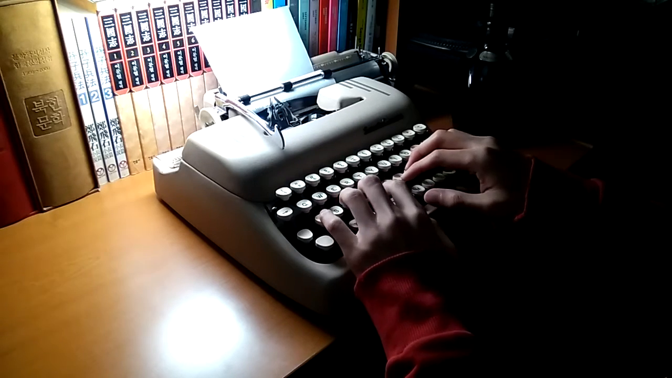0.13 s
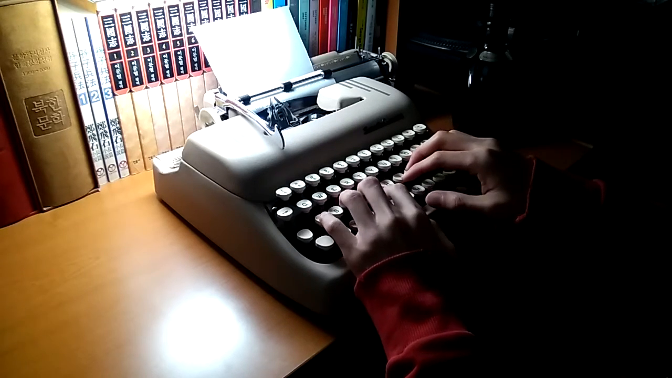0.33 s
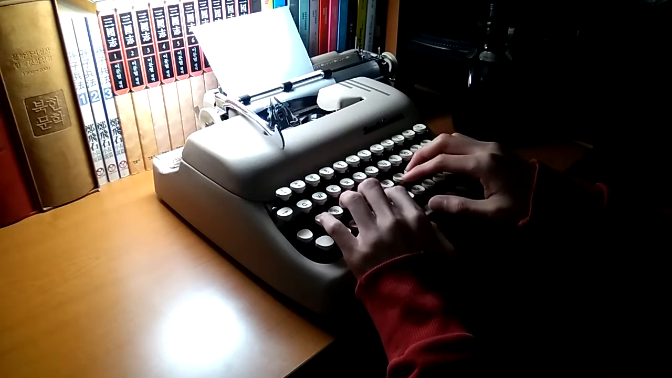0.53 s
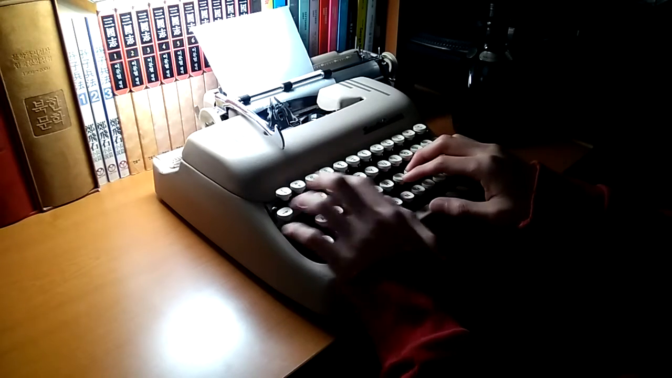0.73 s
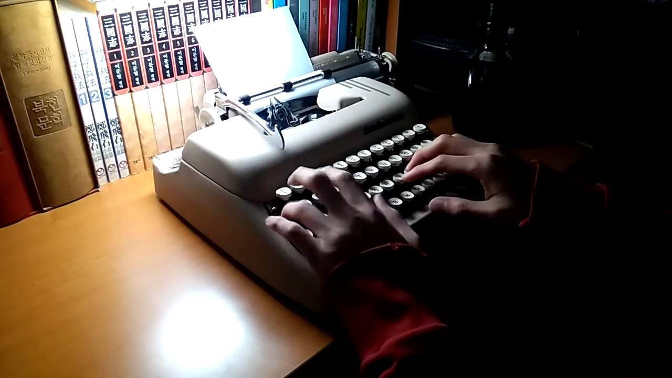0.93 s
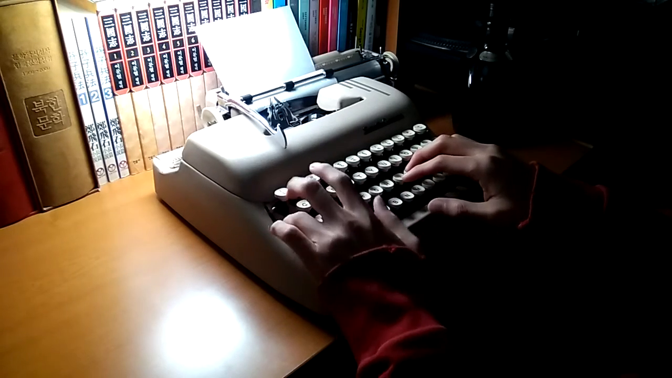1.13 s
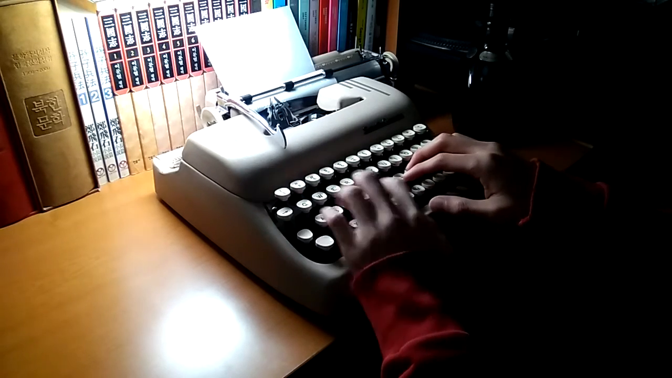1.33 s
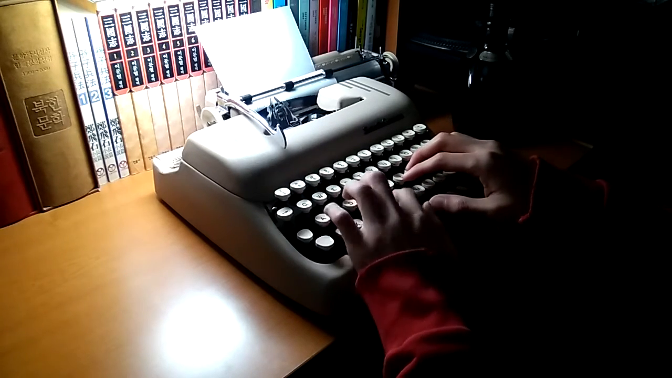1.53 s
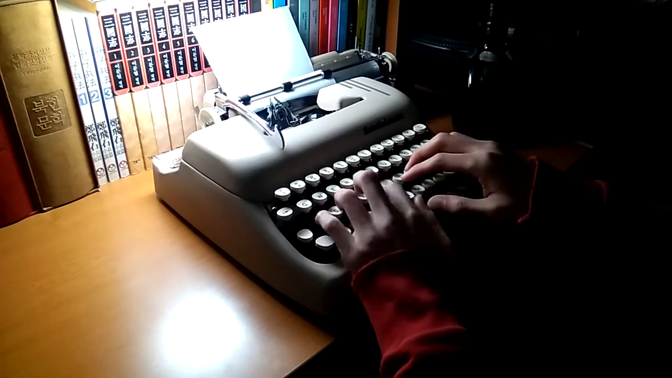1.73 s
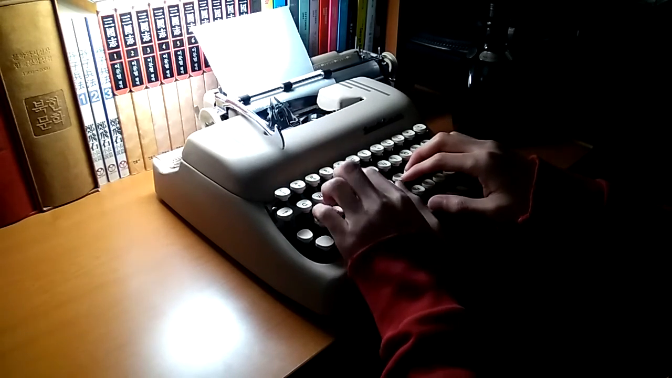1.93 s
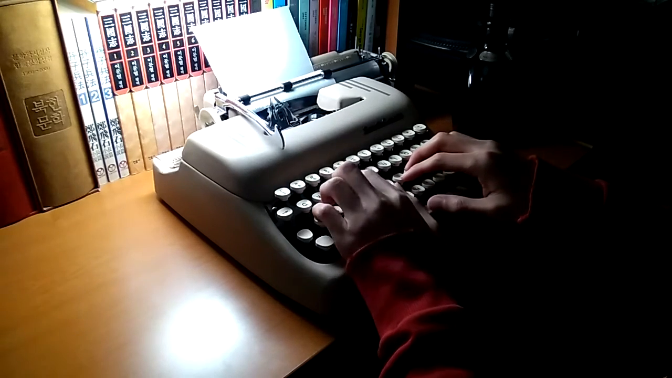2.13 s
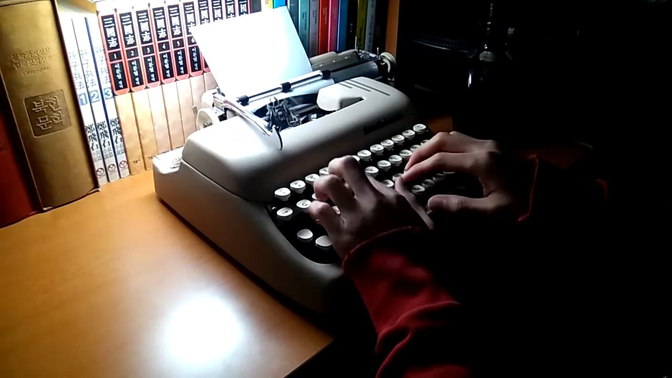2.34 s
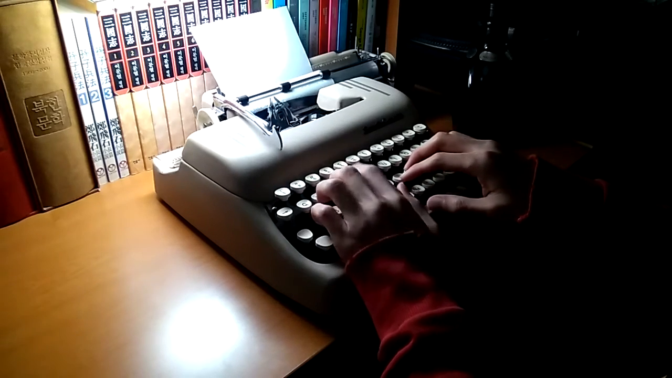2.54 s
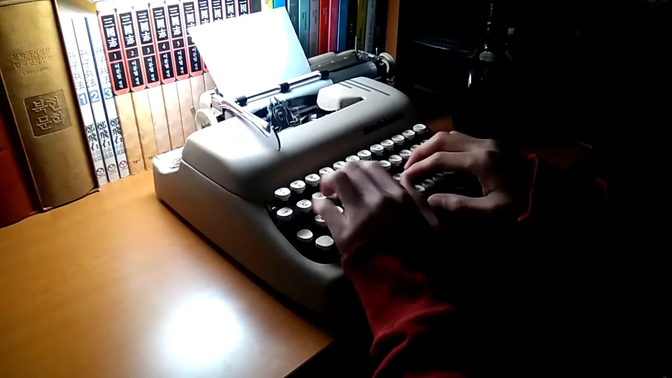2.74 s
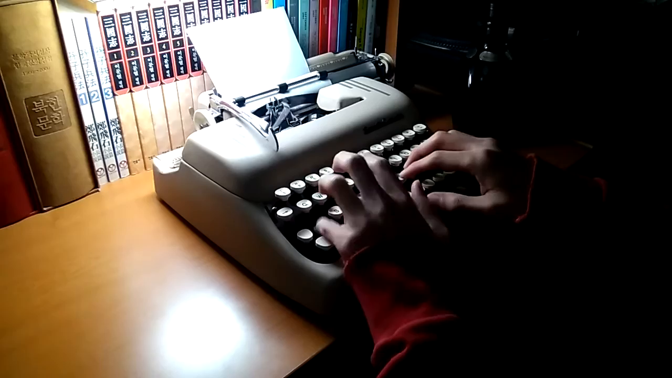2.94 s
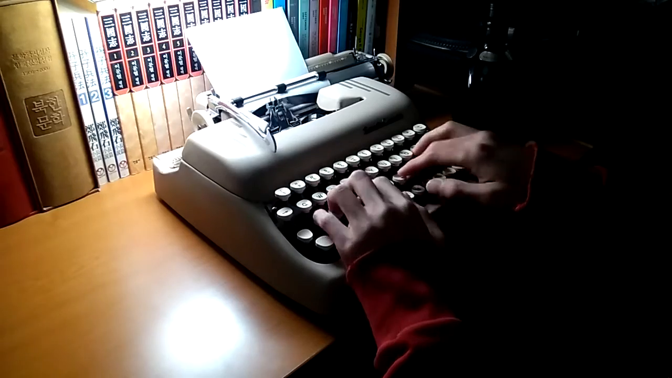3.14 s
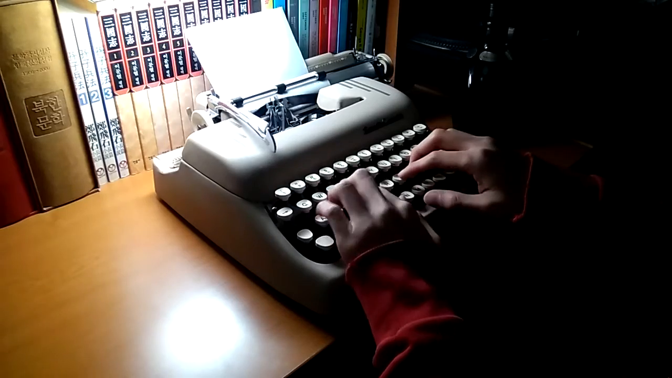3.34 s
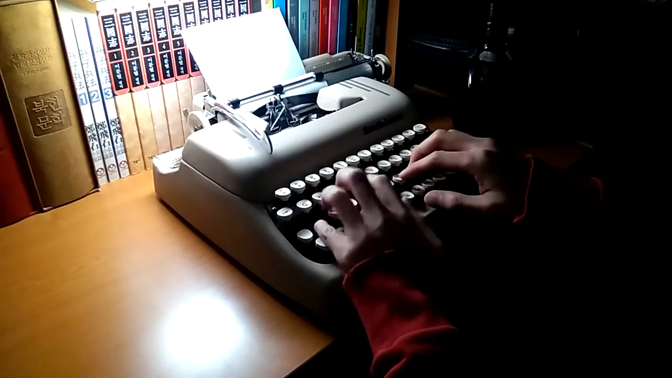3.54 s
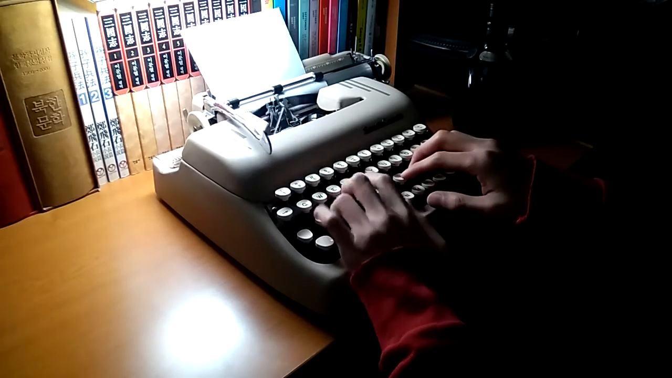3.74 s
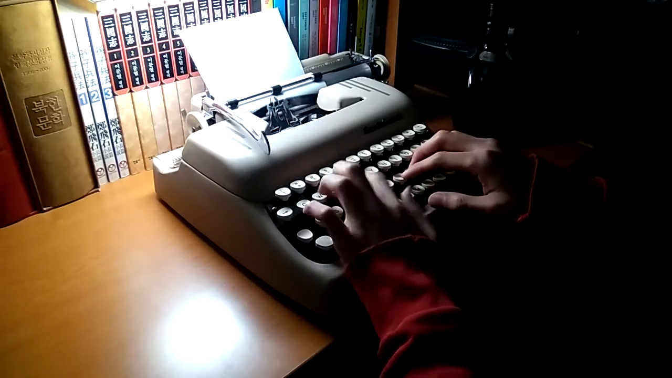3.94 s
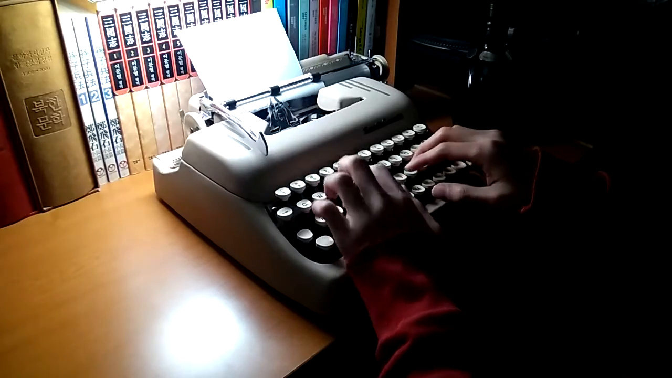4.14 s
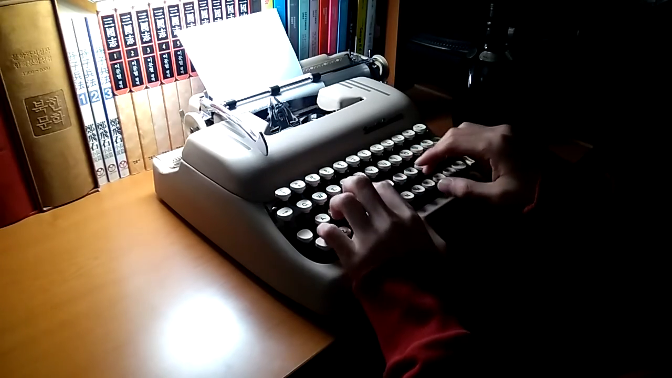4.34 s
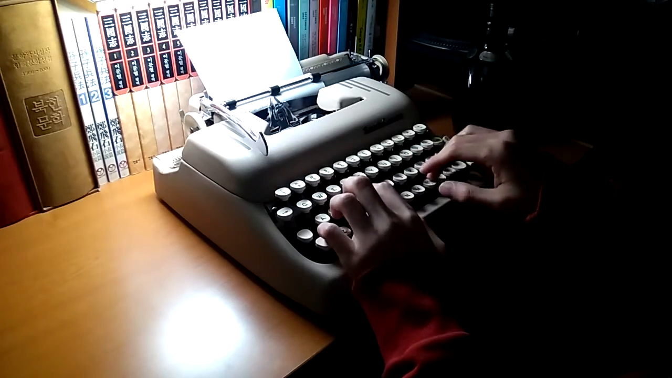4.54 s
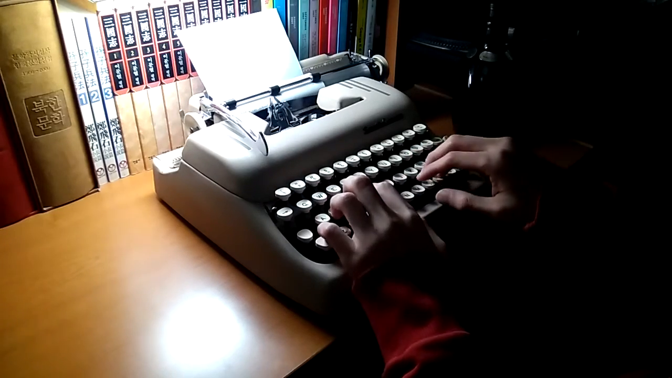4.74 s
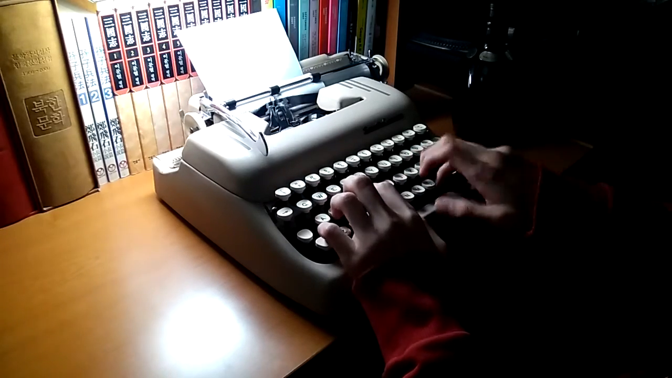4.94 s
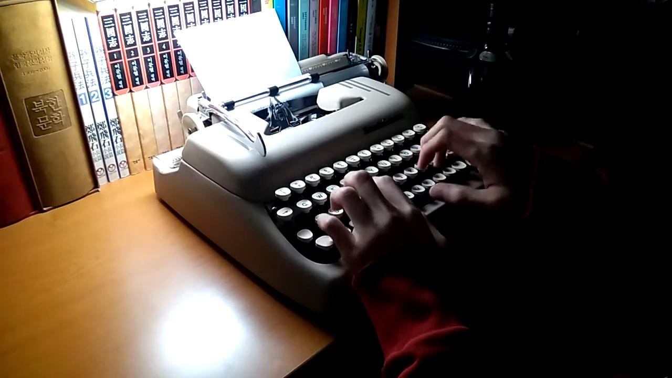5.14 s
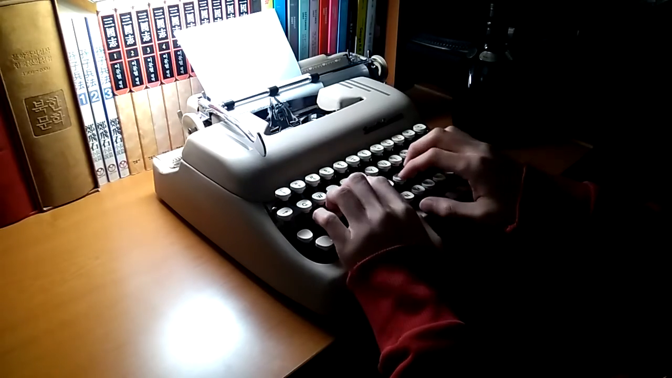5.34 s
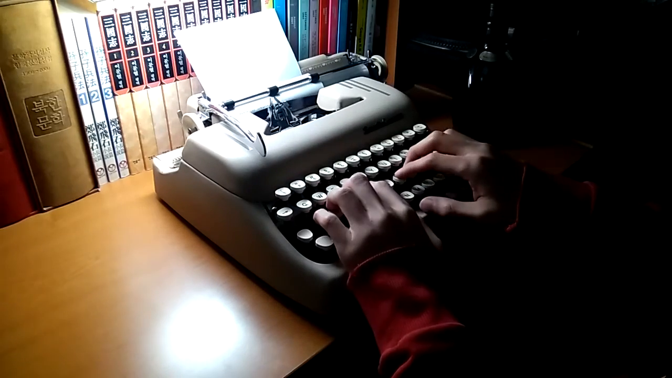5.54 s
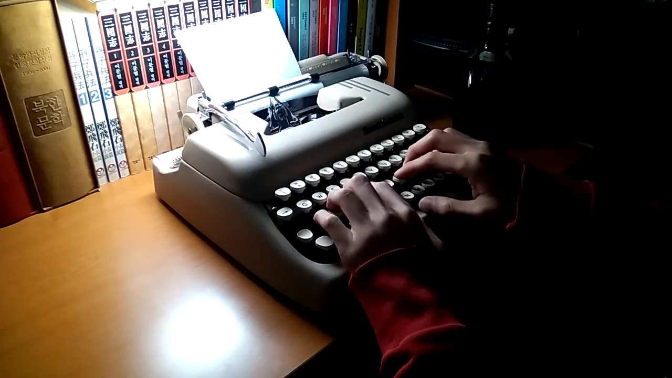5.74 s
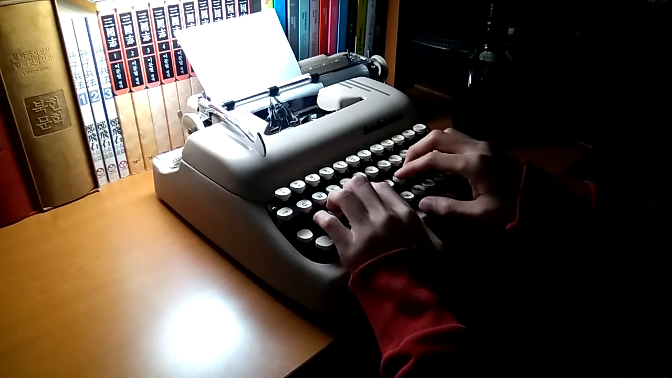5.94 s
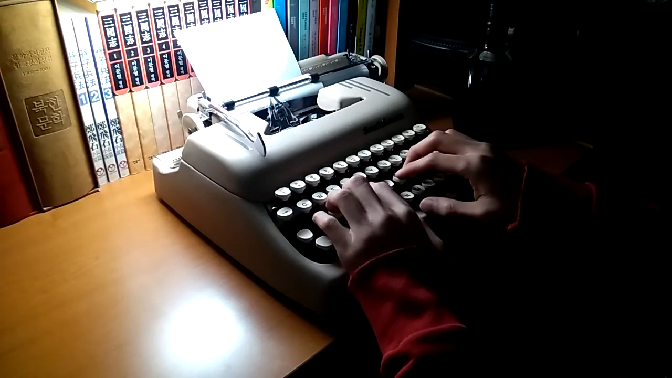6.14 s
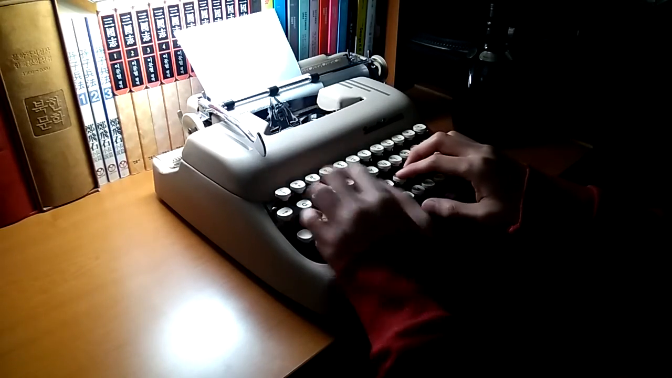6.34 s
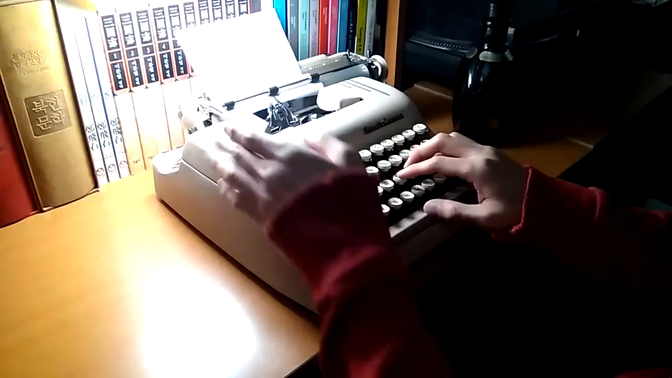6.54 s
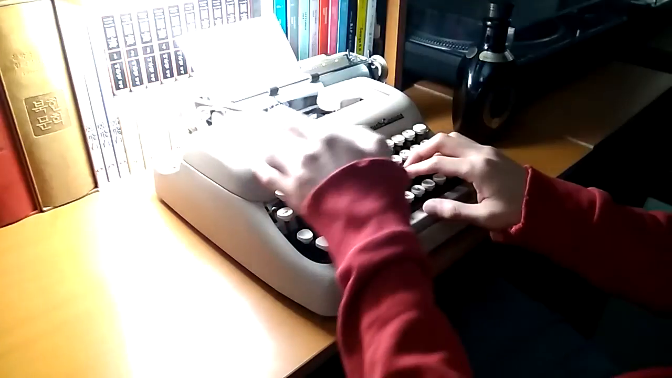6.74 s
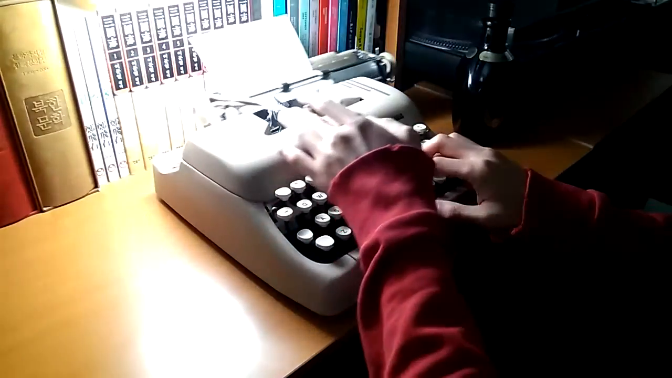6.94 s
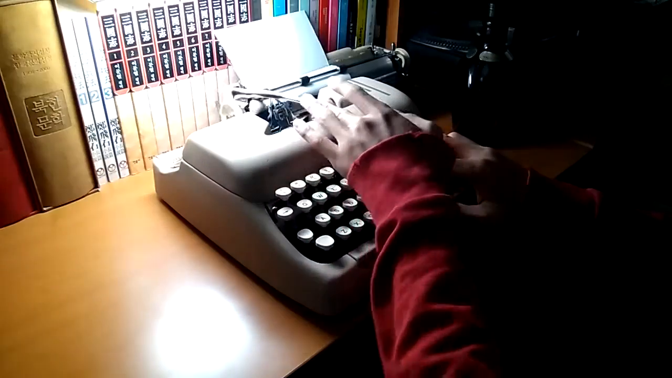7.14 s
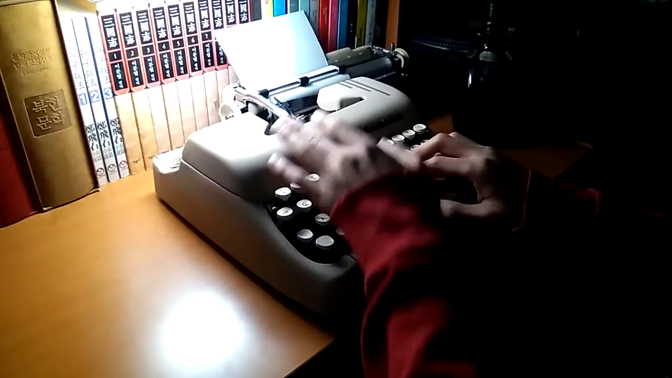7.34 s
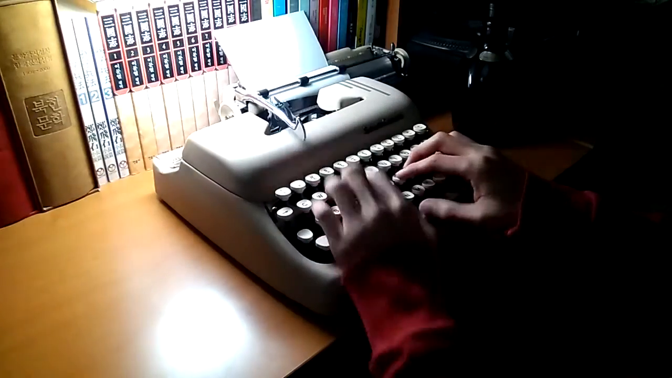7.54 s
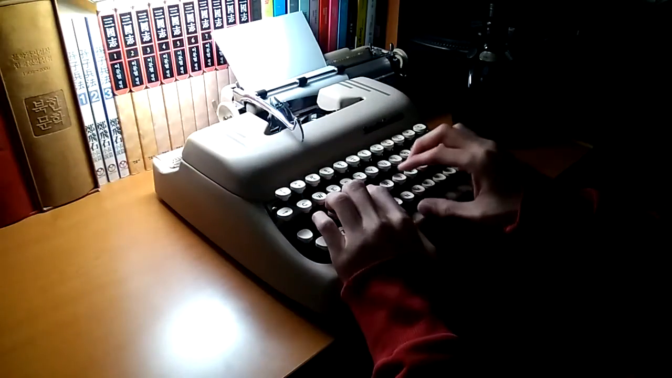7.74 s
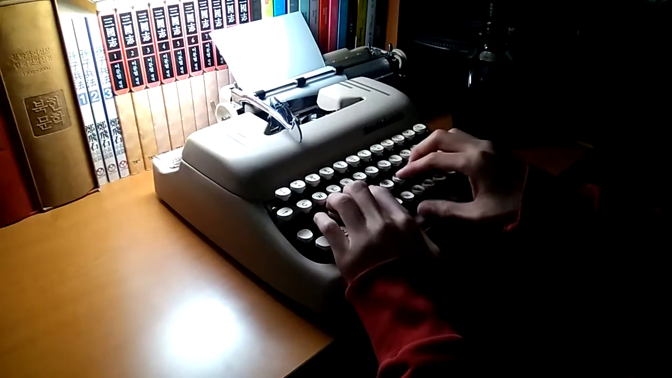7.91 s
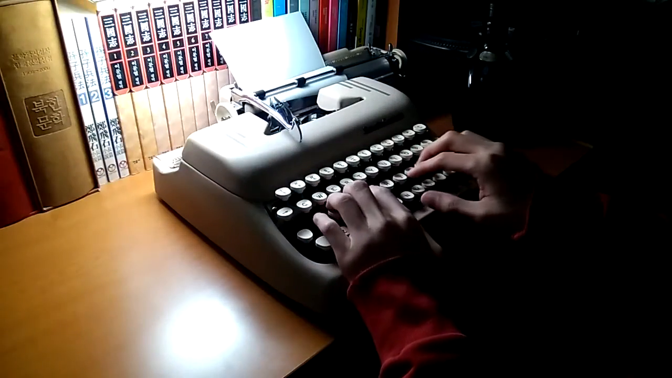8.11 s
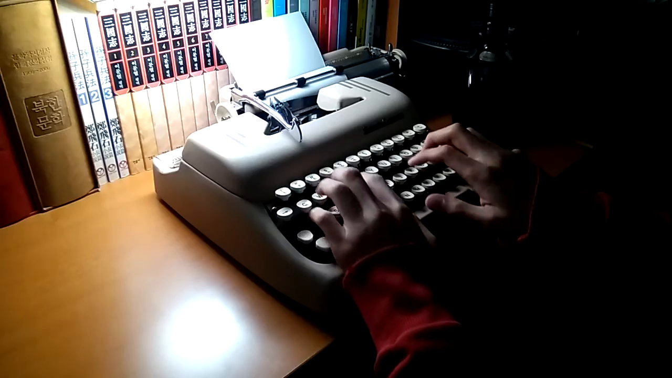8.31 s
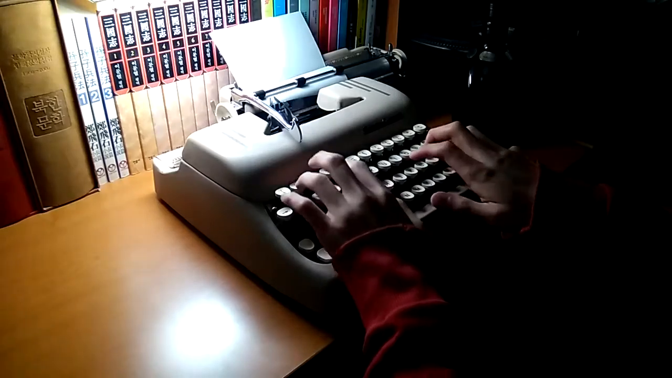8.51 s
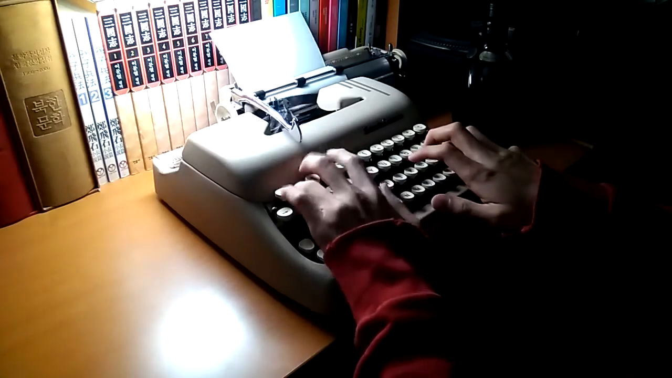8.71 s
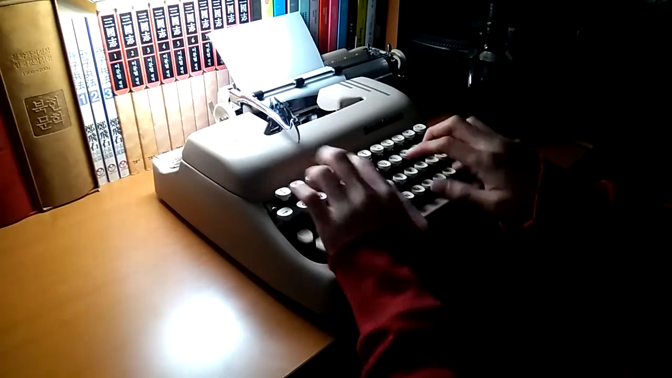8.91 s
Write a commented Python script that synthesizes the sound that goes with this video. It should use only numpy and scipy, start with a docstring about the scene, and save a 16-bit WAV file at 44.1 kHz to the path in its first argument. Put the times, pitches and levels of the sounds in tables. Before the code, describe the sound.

Over a faint fan-like hum in a small quiet room, fingers brush the keys of a manual typewriter and its levers clack. About ten sharp key strikes follow in uneven bursts, each with a loose metal clatter. After a pause, the return lever clacks and the carriage ratchets back against its stop. Two space bar taps and one last letter follow, all close to the microphone.

```python
"""A faint fan-like hum in a small quiet room; then, close to a single microphone, fingers brush the keys
of a portable manual typewriter on a wooden desk, its linkage clacks, and typing comes in short bursts.
Each key goes down, trips the escapement and slaps its typebar on the platen; the carriage steps on and
the typebar falls back with a loose clatter. Late on, the return lever clacks and the carriage ratchets
home against its stop; two spaces and a last letter follow. Desk, case and frame ring with every blow."""
import sys
import numpy as np
from scipy import signal
from scipy.fft import rfft, irfft
from scipy.io import wavfile

SR = 44100
rng = np.random.default_rng(int(sys.argv[2]) if len(sys.argv) > 2 else 0)


def wav_record(signal):
    """Record a signal, one row per channel, as 16-bit PCM in the file named by sys.argv[1]."""
    frames = np.transpose(np.atleast_2d(signal))
    bounded = np.clip(frames, -1, 1)
    # unit amplitude maps onto the largest positive 16-bit level
    quanta = np.round(bounded * 32767).astype(np.int16)
    wavfile.write(sys.argv[1], SR, quanta)


N = 395577

# spectra of the room tone, a low murmur and a hiss: f/Hz, relative density/dB
MURMUR_SPECTRUM = [(25, -46), (85, -34), (135, -18.5), (200, -4), (300, 0.5), (460, -1.5), (620, -6.5),
                   (720, -7.5), (1000, -13.5), (1400, -20.5), (2500, -27), (6000, -39), (15000, -53)]
HISS_SPECTRUM = [(40, -6.5), (2000, -6.5), (5500, -4.5), (6700, -2.5), (7800, -4), (10000, 1), (12500, -3),
                 (15500, -3)]
# hum tones and a thin whine: f/Hz, level/dB
HUM_TONES = [(193.8, -71.5), (242.2, -61.5), (360.7, -75), (425.3, -63.5), (9997, -74)]
# fingers brushing the keys: t/s, level/dB
FINGER_TOUCHES = [(.699, -44.5), (.762, -53), (4.662, -53), (4.712, -53), (6.417, -48), (6.451, -55.5),
                  (6.675, -46), (8.349, -48), (8.618, -54), (8.735, -55)]
# side keys, carriage jolts, return lever: t/s, level/dB, rattle/dB re blow, brightness/dB, ring/Hz, ring/dB
LINKAGE_CLACKS = [(.898, -35.5, -40, 4, 9200, 7), (1.021, -18, -25, -4.5, 6420, 7.5),
                  (1.08, -31, 3, 1, 11800, 2), (1.088, -15.5, -11.5, -3, 11630, 2),
                  (1.141, -23, -8, -1, 11400, -1), (1.15, -21.5, -2, 1, 11600, -5),
                  (1.269, -42.5, 3, -8, 9800, 11), (1.283, -34, -0.5, -11, 10300, 4),
                  (1.303, -18, -9.5, 15, 11300, 2), (1.309, -11.5, -17.5, 0.5, 10140, 9),
                  (6.724, -25, -7, -4, 5810, 7), (6.789, -26, -6.5, -8, 4080, 3),
                  (6.84, -19, -13.5, -6.5, 10050, 2), (7.316, -36.5, -0.5, -13.5, 10100, 7),
                  (7.38, -27, -17, 10.5, 8900, -4), (7.413, -18.5, -14, 3, 4700, 9),
                  (8.413, -48, 3, 3, 6430, 22), (8.427, -38, -1, 4, 9600, 11),
                  (8.456, -31, -3, -11.5, 8050, 4), (8.486, -33, -3.5, -3.5, 9700, -4.5),
                  (8.707, -49, -27.5, 14, 10700, 17)]
# letters typed: t/s, level/dB, brightness/dB, typebar ring/Hz, ring/dB, platen knock/dB,
# key press lead/s, press/dB, carriage step delay/s, typebar landing delay/s, landing/dB
KEYSTROKES = [(1.668, -11, -0.5, 5670, 1, -10.5, 0.044, -35.5, 0.1, 0.15, -17),
              (2.314, -12.5, -.5, 5620, 0, 1, 0.033, -34.5, 0.094, 0.15, -20),
              (2.705, -9, -0.5, 8590, -4.5, -3, 0.032, -33, 0.081, 0.14, -25),
              (2.908, -8.5, -2, 6260, 10.5, -9.5, 0.014, -41.5, 0.12, 0.18, -20.5),
              (3.15, -7.5, 0.5, 8700, 3.5, -15, 0.021, -28, 0.079, .139, -21),
              (3.415, -10, -7.5, 10200, -10.5, -13.5, 0.039, -32, 0.084, 0.14, -22.5),
              (3.583, -8, -3.5, 6230, 8, -10, 0.032, -31.5, 0.092, .163, -22.5),
              (3.811, -6, -6, 10000, -3.5, -23, 0.013, -45, .099, .154, -23.5),
              (4.047, -7.5, -7, 8630, 6, -22, 0.036, -29, 0.096, 0.16, -18.5),
              (5.018, -10, 1, 6500, 9, 5.5, 0.048, -48, 0.095, .147, -27),
              (8.7951, -7.5, 3.5, 12400, 2, -11, .02, -42, 0.055, 0.13, -23.5)]
# carriage sliding home: t/s, tooth rate/Hz, level/dB, pawl ring/dB
CARRIAGE_SLIDE = [(6.928, 42, -32.5, -8.5), (6.972, 60.4, -33.5, -3), (7.009, 73, -32.5, 4),
                  (7.07, 88, -33.5, 7), (7.18, 90, -32.5, 13)]
# carriage hitting the margin stop: t/s, level/dB, rattle/dB re blow, brightness/dB, ring/Hz, ring/dB
MARGIN_STOP = [(7.1812, -16, -2, 4, 10300, -5)]
# space bar: carriage step t/s, release delay/s
SPACES = [(7.691, .074), (7.891, .103)]
# spectra of light metal contacts, type on the platen and the margin stop: f/Hz, relative density/dB
CLACK_SPECTRUM = [(40, -37), (120, -25), (250, -16), (500, -11.5), (1000, -7.5), (1600, -8.5),
                  (2700, -10.5), (4600, -7.5), (7500, -3.5), (9800, 1), (12000, -2.5), (15500, -7)]
STRIKE_SPECTRUM = [(40, -35.5), (120, -40.5), (250, -23.5), (600, -16.5), (1000, -10), (1550, -13),
                   (2000, -4), (3400, -6), (4600, 0), (7500, -2), (9800, 3.5), (12000, -5), (15500, -4.5)]
STOP_SPECTRUM = [(30, -29), (110, -26), (210, -8.5), (500, -16), (1100, -9), (1600, -9.5), (3500, -9.5),
                 (7500, -7), (10200, 0), (12000, -4.5), (15500, -15)]
# resonances of desk, case and frame: f/Hz, width/Hz, level/dB re plain blow
BODY_MODES = [(220, 31, -0.5), (305, 28, 9), (440, 19, -4), (550.5, 34, -1.5), (711.5, 26, 0.5),
              (831, 61, -7.5), (1198, 38, -14), (1870, 51, -8.5), (1968, 51, -13), (2200, 33, -16.5),
              (2293, 23, -8.5), (2940, 54, -12), (3054, 35, -11), (3210, 40, -0.5), (4290, 75, -7.5),
              (4630, 110, -8), (5070, 60, -10), (5570, 81, -7.5), (6290, 71, -9), (11500, 120, -10)]
# reverberation at the microphone, by band: low/Hz, high/Hz, t60/s, level/dB re direct sound
ROOM_BANDS = [(100, 516, 0.49, 1.5), (500, 2720, 0.22, -7), (2460, 9600, 0.095, -13),
              (8000, 20000, 0.17, -9.5)]

# voice of each moving part: rattle/dB re blow, brightness/dB, ring/Hz, ring/dB
FINGERTIP = (-14.5, 2, 10300, 8)
KEY_LEVER, ESCAPEMENT = (1, 3, 11399.5, 5), (2, 4.5, 11399.5, -1.5)
REBOUND, CARRIAGE_STEP = (-9, -2.5, 9645, 2.5), (-5, -1.5, 6352, 7.5)
SPACE_DOWN, SPACE_STEP, SPACE_UP = (3.5, -8.5, 10000, 4), (-4.5, -3, 9200, 11.5), (-17, -4, 7456, 13)
# rest on which the typebars land: brightness/dB, ring/Hz, ring/dB
TYPEBAR_REST = (-.5, 10400, 8)


def from_db(db):
    """Decibels to gain."""
    return 10 ** (np.asarray(db) / 20)


def rms_one(x):
    """Scale to rms 1."""
    return x / np.sqrt(np.mean(x ** 2) + 1e-20)


def add(track, s, sound):
    """Mix a sound into a track at time s."""
    at = round(s * SR)
    track[at:at + len(sound)] += sound[:max(N - at, 0)]


def colour(x, spectrum, size=4096):
    """Causal (minimum-phase) filter with the given spectrum; white noise keeps its power."""
    table_hz, table_db = np.transpose(spectrum)
    hz = np.maximum(np.fft.rfftfreq(size, 1 / SR), 1)
    gain = rms_one(from_db(np.interp(np.log(hz), np.log(table_hz), table_db)))
    cepstrum = irfft(np.log(gain))[:size // 2]
    cepstrum[1:] *= 2
    response = irfft(np.exp(rfft(cepstrum, size)))
    return signal.fftconvolve(x, response)[:N]


def resonance(x, hz, width):
    """Two-pole resonator with gain 1 at its peak."""
    r = np.exp(-np.pi * width / SR)
    feedback = [1, -2 * r * np.cos(2 * np.pi * hz / SR), r * r]
    return (1 - r * r) / 2 * signal.lfilter([1, 0, -1], feedback, x + 1e-18)


def room_tone(murmur_db=-53.5, hiss_db=-65.5, waver_hz=1.5, waver_points=60, low_cut_hz=95):
    """Behind the machine: a fan-like murmur without deep bass, wavering tones, a thin whine and hiss."""
    t = np.arange(N) / SR
    out = from_db(murmur_db) * colour(rng.standard_normal(N), MURMUR_SPECTRUM)
    out += from_db(hiss_db) * colour(rng.standard_normal(N), HISS_SPECTRUM)
    for hz, db in HUM_TONES:
        waver = np.interp(t, np.linspace(0, t[-1], waver_points), rng.normal(0, waver_hz, waver_points))
        out += np.sqrt(2) * from_db(db) * np.sin(2 * np.pi * np.cumsum(hz + waver) / SR)
    return signal.sosfilt(signal.butter(2, low_cut_hz, "high", fs=SR, output="sos"), out)


def jingle(shaking, t60):
    """Countless loose parts store the energy of a shaking and give it back as a dying hiss."""
    keep = from_db(-120 / (t60 * SR))
    energy = signal.lfilter([1 - keep], [1, -keep], shaking ** 2)
    return np.sqrt(energy + 1e-18) * rng.standard_normal(len(shaking))


def blow(level_db, rattle_db, bright_db, ring_hz, ring_db, rise_s, crack_t60, rattle_t60,
         rattles_per_s=500, uneven_db=6.5, ring_width_hz=170,
         basket_db=-3.5, basket_t60=.18, pivot_hz=5000, size=11000):
    """One contact: a short crack, the ring of the struck part and the fading chatter of loose parts."""
    t = np.arange(size) / SR
    rise = 1 - np.exp(-t / rise_s)
    crack = rng.standard_normal(size) * from_db(-60 * t / crack_t60) * rise
    touches = (rng.random(size) < rattles_per_s / SR) * from_db(uneven_db * rng.standard_normal(size))
    chatter = rms_one(jingle(touches + touches.std() / 2, t60=.018))
    chatter *= from_db(rattle_db - 60 * t / rattle_t60) * rise
    ring = from_db(ring_db) * resonance(crack + chatter / 2, ring_hz, ring_width_hz)
    force = crack + chatter + ring
    # the basket of resting typebars and their springs shivers in sympathy
    force += from_db(basket_db) * jingle(force, basket_t60)
    # a hard contact favours the treble, a soft one the bass
    bass = signal.lfilter(*signal.butter(1, pivot_hz, fs=SR), force)
    treble = force - bass
    return from_db(level_db) * (bass * from_db(-bright_db / 2) + treble * from_db(bright_db / 2))


def blows(rows, springs_db=-8.5, **shape):
    """A track of timed contacts; each also sets four of the many springs and links pinging."""
    track = np.zeros(N)
    for s, *contact in rows:
        force = blow(*contact, **shape)
        springs = sum(resonance(force, hz, width=200) for hz in rng.uniform(4000, 15000, 4))
        add(track, s, force + from_db(springs_db) * springs)
    return track


def linkage(gain_db=3):
    """All the lighter contacts, from the first brush of a finger to the clacks of the levers."""
    touches = [(s, db, *FINGERTIP) for s, db in FINGER_TOUCHES]
    light_contacts = touches + key_returns() + space_bar()
    force = key_presses() + escapement()
    force += blows(light_contacts, rise_s=.0014, crack_t60=.022, rattle_t60=.11, uneven_db=3)
    force += blows(LINKAGE_CLACKS, rise_s=.0016, crack_t60=.022, rattle_t60=.09,
                   ring_width_hz=320, basket_db=-4, basket_t60=.17)
    return from_db(gain_db) * colour(force, CLACK_SPECTRUM)


def key_presses(slack_s=.022, slack_db=-14, low_cut_hz=3000):
    """The finger takes up the slack, then presses the key home; the thin levers give mostly treble."""
    contacts = []
    for s, *_, press_s, press_db, _, _, _ in KEYSTROKES:
        contacts += [(s - press_s - slack_s, press_db + slack_db, *KEY_LEVER),
                     (s - press_s, press_db, *KEY_LEVER)]
    force = blows(contacts, rise_s=.007, crack_t60=.035, rattle_t60=.12, uneven_db=3)
    return signal.lfilter(*signal.butter(1, low_cut_hz, "high", fs=SR), force)


def ping(level_db, hz, t60, detune_hz, rise_s=.001, uneven_db=3, count=3, size=13000):
    """One mode, or a few close ones that beat, dying freely and a little different each time."""
    t = np.arange(size) / SR
    mode_hz = hz + detune_hz * rng.standard_normal(count)
    modes = np.sin(2 * np.pi * np.outer(mode_hz, t) + rng.uniform(0, 2 * np.pi, (count, 1)))
    envelope = from_db(level_db + uneven_db * rng.normal() - 60 * t / t60) * (1 - np.exp(-t / rise_s))
    return envelope * modes.sum(0) / np.sqrt(count)


def free_rings():
    """Key spring, desk and escapement wheel ring on with every letter."""
    out = np.zeros(N)
    spring = dict(hz=11200, t60=.12, detune_hz=70)
    for s, db, *_, press_s, press_db, step_s, landing_s, _ in KEYSTROKES:
        add(out, s - press_s, ping(press_db - 4, **spring))
        # the strike pushes the machine into the desk
        add(out, s, ping(db - 55, hz=68, t60=.07, detune_hz=8, rise_s=.01, count=1))
        # the wheel rings after the step, the spring again just before the typebar lands back
        add(out, s + step_s, ping(-41, hz=6360, t60=.25, detune_hz=90))
        add(out, s + landing_s - .018, ping(-37, **spring))
    return out


def escapement(lead_s=.0085, level_db=-24.5):
    """The rising typebar trips the escapement just before it strikes."""
    trips = [(s - lead_s, level_db, *ESCAPEMENT) for s, *_ in KEYSTROKES]
    return blows(trips, rise_s=.0012, crack_t60=.02, rattle_t60=.1, uneven_db=3.5)


def typebars(gain_db=2, snap_db=2.6, rattle_db=-22):
    """The type slug slaps the paper in one short snap; the rubber platen answers with a dull knock."""
    force = np.zeros(N)
    for s, db, bright_db, ring_hz, ring_db, knock_db, *_ in KEYSTROKES:
        slap_db = db + snap_db
        # loose parts rattle about equally whatever the blow
        slap = blow(slap_db, rattle_db - slap_db, bright_db, ring_hz, ring_db,
                    rise_s=.0004, crack_t60=.009, rattle_t60=.17,
                    rattles_per_s=800, uneven_db=2.5, ring_width_hz=300, basket_db=-9)
        knock = from_db(knock_db) * resonance(slap, hz=900, width=500)
        add(force, s, slap + knock)
    return from_db(gain_db) * colour(force, STRIKE_SPECTRUM)


def key_returns(rebound_s=.05, rebound_db=-22, step_db=-25, rattle_db=-32.5):
    """After each strike the typebar rebounds, the carriage steps on and the typebar lands on its rest."""
    contacts = []
    for s, *_, step_s, landing_s, landing_db in KEYSTROKES:
        contacts += [(s + rebound_s, rebound_db, *REBOUND),
                     (s + step_s, step_db, *CARRIAGE_STEP),
                     (s + landing_s, landing_db, rattle_db - landing_db, *TYPEBAR_REST)]
    return contacts


def carriage_return():
    """The pawl ticks over the rack, faster as the carriage gains speed, until it slams into the stop."""
    s, teeth_per_s, level_db, ring_db = np.transpose(CARRIAGE_SLIDE)
    t = np.arange(s[0], s[-1], 1 / SR)
    teeth_passed = np.floor(np.cumsum(np.interp(t, s, teeth_per_s)) / SR)
    rack = np.zeros(N)
    for at in t[np.diff(teeth_passed, prepend=-1) > 0]:
        tick = blow(np.interp(at, s, level_db), rattle_db=-3.5, bright_db=4.5, ring_hz=4550, ring_db=3,
                    rise_s=.0012, crack_t60=.024, rattle_t60=.17)
        add(rack, at, tick)
    # the pawl sings more as the carriage nears home
    pawl_gain = from_db(np.interp(np.arange(N) / SR, s, ring_db))
    rack += pawl_gain * resonance(rack, hz=7550, width=90)
    slam = blows(MARGIN_STOP, rise_s=.0007, crack_t60=.055, rattle_t60=.12)
    return colour(rack, CLACK_SPECTRUM) + colour(slam, STOP_SPECTRUM)


def space_bar(lead_s=.045, bounce_s=.016, down_db=-37, step_db=-23, bounce_db=-26.5, up_db=-21):
    """The bar goes down, the carriage steps on and bounces once, the bar springs back."""
    contacts = []
    for s, held_s in SPACES:
        contacts += [(s - lead_s, down_db, *SPACE_DOWN),
                     (s, step_db, *SPACE_STEP),
                     (s + bounce_s, bounce_db, *SPACE_STEP),
                     (s + held_s, up_db, *SPACE_UP)]
    return contacts


def body(force):
    """Every blow sets the same desk, case and frame ringing."""
    return force + sum(from_db(db) * resonance(force, hz, width) for hz, width, db in BODY_MODES)


def room(direct, first_echo_s=.002, size=18000):
    """Dense reflections from desk, books and walls reach the microphone; the bass lingers longest."""
    t, tail = np.arange(size) / SR, np.zeros(size)
    onset = np.clip(t / first_echo_s - .5, 0, 1)
    for low, high, t60, wet_db in ROOM_BANDS:
        band = signal.butter(2, [low, high], "band", fs=SR, output="sos")
        echoes = signal.sosfilt(band, rng.standard_normal(size))
        decay = from_db(-60 * t / t60) * onset
        tail += from_db(wet_db) * echoes * decay / np.linalg.norm(decay)
    return direct + signal.fftconvolve(direct, tail)[:N]


def scene():
    """Mono, close to the desk: linkage, platen and carriage each reach the walls by their own paths."""
    machine = sum(room(body(part)) for part in (linkage(), typebars(), carriage_return()))
    return (room_tone() + machine + free_rings())[None]


def record(dry, cutoff_hz=15750):
    """The microphone chain rounds the tallest peaks and cuts the top treble steeply."""
    high_cut = signal.ellip(12, .1, 80, cutoff_hz, fs=SR, output="sos")
    return signal.sosfilt(high_cut, np.tanh(dry))


dry = scene()
out = record(dry)
wav_record(out)
```